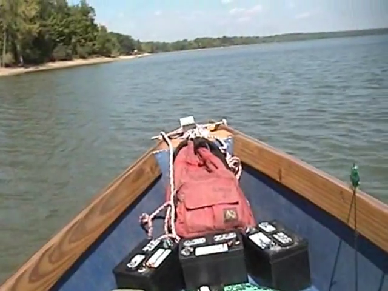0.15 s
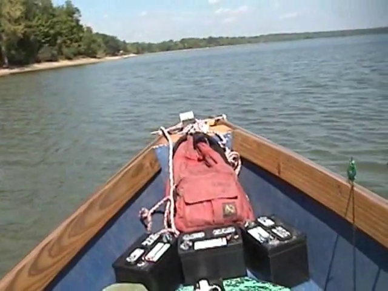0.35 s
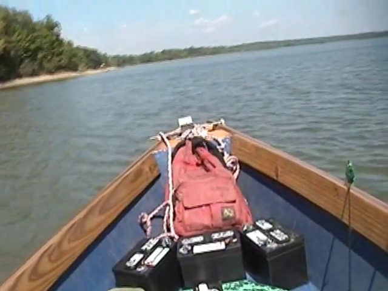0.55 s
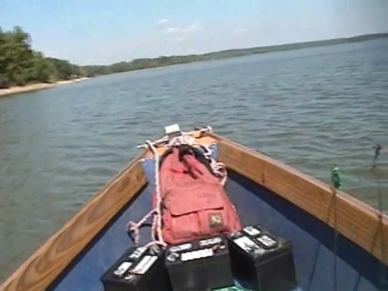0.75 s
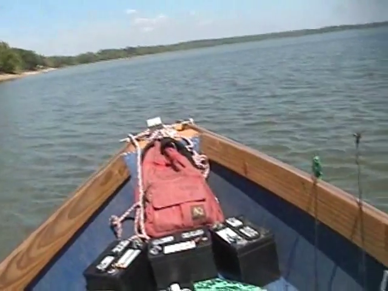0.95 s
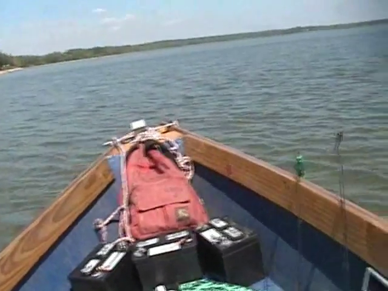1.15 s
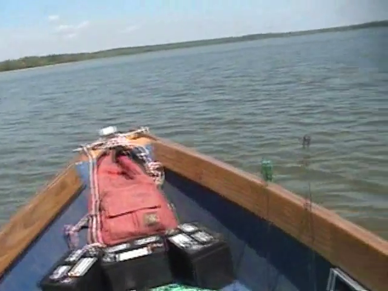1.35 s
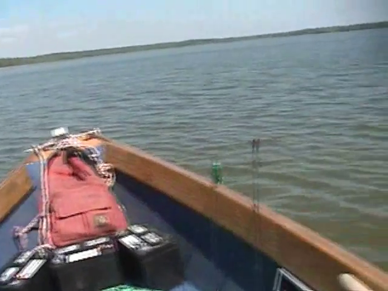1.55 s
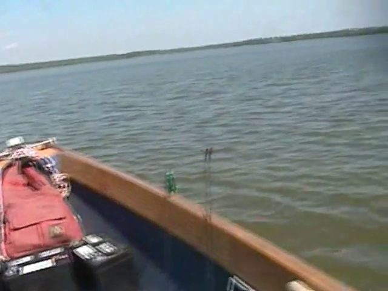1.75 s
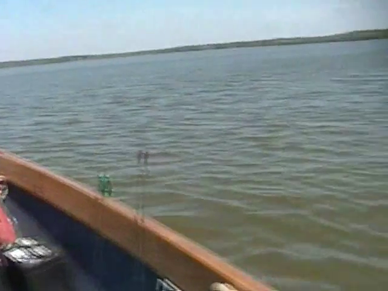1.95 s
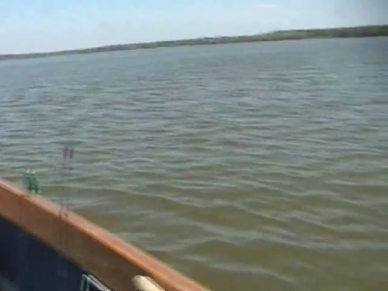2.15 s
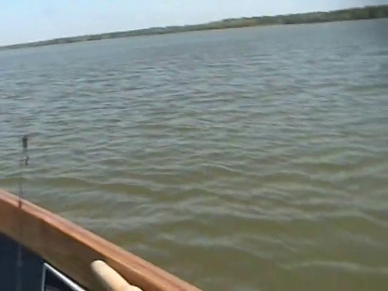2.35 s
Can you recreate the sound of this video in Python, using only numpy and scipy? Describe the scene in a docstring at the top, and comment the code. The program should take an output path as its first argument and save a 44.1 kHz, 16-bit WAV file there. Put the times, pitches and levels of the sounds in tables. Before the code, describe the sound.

Wind rumbles and thumps the stereo onboard microphone over soft water wash. At about 0.25 seconds an electric outboard kicks in, racing up to a loud, gritty, hissing whine. It cuts near 0.6, pitch falling fast with a short groan, and metallic rattle and ringing fade until about 1.3. Small hull clunks come around 1.2, 1.6 and 2.0, over quiet wash, light hiss and a faint wavering hum to 2.4.

```python
"""A grinder motor whines up, pulls for a moment and coasts down: a home-built electric outboard on a small wooden boat.
Its tones are sines tied to the shaft speed; rattle and hiss are noise coloured by the ringing metal casing.
Noise washes along the hull over a hum of steady sines; decaying sines make wind thumps, then hull clunks and glugs.
Wind buffets the two microphone ports with low noise and single pops; the microphone adds hiss and clips softly."""
import sys
import numpy as np
from scipy import signal
from scipy.fft import rfft, irfft, next_fast_len
from scipy.io import wavfile
from scipy.ndimage import uniform_filter1d, map_coordinates

SR = 44100
rng = np.random.default_rng(int(sys.argv[2]) if len(sys.argv) > 2 else 0)


def unload_audio(sound):
    """Save the sound as a 16-bit wav file, at the path given as the first command line argument."""
    columns = np.transpose(np.atleast_2d(sound))
    # keep every value between -1 and 1, then stretch to whole-number steps
    steps = np.round(np.clip(columns, -1, 1) * 32767)
    wavfile.write(sys.argv[1], SR, steps.astype(np.int16))


N = 105840

# likeness of the two ports for the motor noise: freq_hz, correlation
MOTOR_ALIKE = [(500, 1), (1000, 0.94), (2000, 0.7), (5000, 0.89), (9000, 0.16)]
# the motor heard across the two ports: freq_hz, left_over_right_db
MOTOR_BALANCE = [(500, 0.5), (1300, 0.5), (2200, 5), (3700, 10), (6000, 2.5), (12000, 1.5)]
# its phase across the ports: freq_hz, left_lead_radians
MOTOR_LEAD = [(600, 0.18), (1500, 0.32), (3500, 0.59), (6000, 0.76)]


def motor():
    """The motor's shaft, casing noise and ringing parts, placed together across the microphone ports."""
    return placed(shaft() + casing_noise() + ringing_parts(), MOTOR_BALANCE, MOTOR_LEAD)


# shaft speed: time_s, turns_per_s
SHAFT_SPEED = [(.26, 60), (.32, 165), (.345, 192), (.365, 214), (.385, 229), (.42, 248), (.45, 260),
               (.48, 267), (.52, 271.5), (.56, 274.5), (.594, 275.5), (.61, 237), (.625, 217), (.645, 190),
               (.665, 162), (.7, 125), (.8, 75)]
# drive level before the casing and a final trim: time_s, tones_db, fan_db
DRIVE = [(.27, -56, -43), (.33, -33, -28), (.365, -19, -21), (.395, -17.5, -26), (.46, -19.5, -24),
         (.53, -17.5, -21), (.592, -18.5, -24), (.61, -23, -22), (.645, -23.5, -23), (.675, -30, -29),
         (.72, -45, -42), (.8, -60, -57)]
# tones locked to the shaft: multiple of the shaft speed
SHAFT_MULTIPLES = [2, 8, 10, 11, 12, 13, 15, 17, 19, 20, 21]
# level of each of those tones under the drive: level_db
SHAFT_MULTIPLES_DB = [-11, -14, -13, -2, -13, -3, -13, -11, -13, -7, -7]
# noisy bands riding on the speed: multiple, width_hz, level_db under the drive
FAN_BANDS = [(20.36, 180, 2.5), (13.08, 190, 0.5)]
TONE_JITTER, TONE_FLUTTER_DB = .002, 3  # pitch fraction and dB, scaling the random curves


def shaft():
    """Sines at multiples of the shaft speed, and fan bands made by a random curve modulating such sines."""
    speed = curves(SHAFT_SPEED)[0]
    tones_db, fan_db = curves(DRIVE)
    tones = 0
    for multiple, db in zip(SHAFT_MULTIPLES, SHAFT_MULTIPLES_DB):
        level = amp(db + TONE_FLUTTER_DB * wobble(70.7))
        tones = tones + level * sine(multiple * speed * (1 + TONE_JITTER * wobble(59.5)))
    fan = sum(amp(db) * wobble(2 * width) * sine(multiple * speed) for multiple, width, db in FAN_BANDS)
    driven = (tones * amp(tones_db) + fan * amp(fan_db)) * gate(DRIVE)
    # the casing colours these more gently than it does the noise: square root of its gain
    return filtered(driven, lambda hz: amp(-5.5) * casing(hz, column=2) ** .5)


# metal casing resonances: pitch_hz
CASING_HZ = [530, 980, 1528, 1715, 1890, 2070, 2148, 2548, 2720, 2990, 3330, 3936, 4140, 4420, 5485, 6045,
             7543]
# each of them: width_hz, rattle_db, hiss_and_shaft_db (both under the lift, half their dB in peak gain)
CASING = [(56, -14, 10), (50, -1, -8), (18.519, -2, 13.5), (45.4, -6, 13), (13, 1, -21), (16, -5, -16),
          (29, 2, -22), (24.7, 2, 5), (11, 7, 11), (45, -26, 6), (11.4, -3, -2), (24, 10, 6), (19, 8.5, 5),
          (70, -3, -1), (90, -2, -7.5), (29.8, -7, -5), (14, -8, 8.5)]
CASING_LIFT_DB = 9.5  # all resonances over the flat part


def casing(hz, column):
    """Gain of the casing: a flat part plus resonance peaks, summed as power."""
    peaks = 0
    for centre, mode in zip(CASING_HZ, CASING):
        peaks = peaks + amp(mode[column]) / (1 + (2 * (hz - centre) / mode[0]) ** 2)
    return np.sqrt(1 + amp(2 * CASING_LIFT_DB) * peaks)


# motor noise before small trims: time_s, casing_rattle_db, brush_and_fan_hiss_db
MOTOR_NOISE = [(0.25, -62, -67), (0.256, -43, -65), (0.282, -21.5, -32.5), (0.304, -15.5, -24),
               (0.368, -17.5, -15), (0.386, -17.5, -11.5), (0.608, -17.5, -13.5), (0.716, -13, -22),
               (0.726, -14.5, -20.5), (1.224, -34.5, -54.5), (1.434, -50, -60), (1.448, -50, -47),
               (1.462, -48, -62), (1.55, -51, -59)]
# rattle spectrum before the casing: freq_hz, density_db
RATTLE = [(250, -12), (500, -3), (780, -12.5), (1100, 6.5), (1500, -1), (2200, 0.5), (3500, -6.5),
          (5500, -16.5), (6800, -37), (9000, -56)]
# brush and fan hiss spectrum before the casing: freq_hz, density_db
HISS = [(1200, -9.5), (2500, -2), (3500, -3), (5000, -4.5), (6000, -3.5), (7000, -15.5), (8500, -25),
        (11000, -18.5), (13500, -35), (15300, -50)]


def casing_noise():
    """Rattle of the casing and hiss of brushes and fan: two noises, each through the casing resonances."""
    rattle_db, hiss_db = curves(MOTOR_NOISE)
    rattle_noise = rush(lambda hz: closed(RATTLE)(hz) * casing(hz, column=1), MOTOR_ALIKE, patchy_db=2.0)
    hiss_noise = rush(lambda hz: closed(HISS)(hz) * casing(hz, column=2), MOTOR_ALIKE, patchy_db=1.8)
    rattle = amp(rattle_db - 0.5 + 2.8 * wobble(13.32)) * rattle_noise
    hiss = amp(hiss_db - 1.25) * hiss_noise
    return (rattle + hiss) * gate(MOTOR_NOISE)


# ring of the shaft tube: time_s, level_db
TUBE = [(.3, -45), (.33, -31), (.346, -19), (.362, -31), (.5, -30), (.635, -32), (.667, -16), (.695, -26),
        (.72, -29), (.745, -19), (.77, -27), (.806, -21), (.86, -26), (.9, -37), (.926, -29), (.948, -37),
        (1.018, -31), (1.046, -40), (1.076, -34), (1.14, -31), (1.21, -30), (1.24, -46), (1.3, -48)]
# drumming of the hull: time_s, level_db
HULL = [(0.2, -40), (0.26, -33), (0.286, -32), (0.358, -24), (0.488, -46), (0.668, -29), (0.752, -35),
        (0.8, -42)]
# a thin whistle in the run-down: time_s, level_db
WHISTLE = [(.78, -54), (.815, -40), (.85, -47), (.9, -46), (.94, -55)]
# a falling groan after switch-off: time_s, pitch_hz, level_db
GROAN = [(.66, 531, -36), (.7, 529, -22.5), (.735, 476, -33), (.765, 443, -23.5), (.79, 400, -46)]
# gear mesh tone while the motor pulls: time_s, pitch_hz, level_db
GEAR_MESH = [(.36, 780, -38), (.384, 836, -21), (.393, 870, -29), (.404, 890, -17), (.44, 928, -25),
             (.456, 960, -19), (.49, 972, -17), (.544, 986, -20), (.594, 986, -21), (.604, 965, -32),
             (.615, 850, -42)]
# a casing panel sings: time_s, pitch_hz, level_db
PANEL = [(.37, 1690, -34), (.41, 1700, -22), (.435, 1700, -28), (.474, 1729, -16), (.5, 1732, -20),
         (.53, 1735, -31), (.56, 1740, -38)]
TUBE_HZ, TUBE_TWIN_HZ, TUBE_TWIN_DB = 1133, 1156, -8  # the twin's level is relative to the first ring
HULL_HZ, WHISTLE_HZ = 119, 5006


def ringing_parts():
    """Single unsteady sines for tube, hull and whistle at set pitches, and groan, gears and panel on pitch curves."""
    tube = ring(TUBE, TUBE_HZ) + amp(TUBE_TWIN_DB) * ring(TUBE, TUBE_TWIN_HZ)
    fixed_pitch = tube + ring(HULL, HULL_HZ) + ring(WHISTLE, WHISTLE_HZ)
    return fixed_pitch + sum(ring(rows, curves(rows)[0]) for rows in (GROAN, GEAR_MESH, PANEL))


# wash along the hull: time_s, level_db
WASH_LEVEL = [(0.0, -32), (0.23, -33), (0.38, -17.5), (0.46, -20.5), (0.59, -21), (0.75, -30),
              (1.14, -29.5), (1.4, -33), (2.4, -31)]
# wash spectrum: freq_hz, density_db
WASH = [(40, -22), (100, -8.5), (250, -8), (330, -1), (450, -0.5), (620, 0.5), (800, -3), (1000, -6.5),
        (1200, -7.5), (1500, -11.5), (3000, -20), (6400, -27), (7200, -33)]
# likeness of the wash at the two ports: freq_hz, correlation
WASH_ALIKE = [(200, 0.97), (800, 1), (1600, 0.7), (5000, 0.38)]
# the wash across the ports: freq_hz, left_over_right_db
WASH_BALANCE = [(300, 1), (800, -2.5), (2200, 3.5), (3700, 5.5), (6100, 1)]


def water_wash():
    """Wash along the hull: coloured noise on a slightly fluttering level curve."""
    level = amp(curves(WASH_LEVEL)[0] + 0.63 * wobble(24.1))
    wash = level * rush(closed(WASH), WASH_ALIKE, patchy_db=1.15)
    return placed(wash, WASH_BALANCE, [(600, 0.033), (3000, 0.19)])


# short thumps of wind on the microphone, then clunks and glugs at the hull:
# start_s, start_pitch_hz, level_db before attack and a gain of 3, t60_s
THUMPS = [(.15, 171, -17, 0.047), (0.169, 310, -12, 0.025), (.228, 630, -12, 0.017),
          (0.257, 359, -12, 0.063), (.78, 594, -14.5, 0.023), (1.155, 665, -18, .025),
          (1.185, 287, -18, 0.092), (1.203, 870, -18.5, 0.015), (1.315, 297, -30, 0.011),
          (1.644, 520, -23, 0.04), (2.04, 374, -19, 0.04)]
THUMP_RISE = 0.34  # the pitch climbs by twice this fraction over one t60


def thumps_and_glugs():
    """Wind thumps on the microphone, then hull clunks and glugs: decaying sines that rise in pitch."""
    out, t = np.zeros(N + SR), np.arange(SR // 4) / SR
    for start, hz, db, t60 in THUMPS:
        phase = 2 * np.pi * hz * (t + THUMP_RISE * t * t / t60)
        attack = 1 - np.exp(-t / (0.19 * t60))
        out[round(start * SR):][:len(t)] += amp(db - 60 * t / t60) * attack * 3 * np.sin(phase)
    return out[:N]


# buffeting of the microphone, before a 3 dB lift: time_s, level_db
WIND_LEVEL = [(0.0, -26.5), (0.04, -26.5), (0.07, -35), (0.16, -21), (0.26, -22), (0.31, -18),
              (0.45, -42.5), (0.55, -39), (0.58, -26.5), (0.62, -35), (0.65, -29), (0.73, -25.5),
              (0.78, -39.5), (0.95, -25), (1.0, -34), (1.08, -37), (1.12, -39), (1.2, -36), (1.29, -35.5),
              (1.36, -33.5), (1.45, -51.5), (1.9, -66), (2.0, -45), (2.14, -40.5), (2.17, -43), (2.35, -54),
              (2.4, -58)]
# buffeting spectrum: freq_hz, density_db
BUFFET = [(12, -67.5), (20, -18), (117, 0), (242, 0.5), (280, -6), (507, -8.5), (755, -16), (1500, -25.5),
          (1950, -43), (3300, -120)]
# wind pops: centre_s, width_s, left_db, right_db
POPS = [(0.171, 0.00042, -8, -15), (.231, 0.00033, -7, -2.5), (.32, .001, -22, -12),
        (0.72, 0.0014, -27, -21), (.92, 0.0012, -9, -13), (1.318, 0.00091, -22, -27),
        (1.382, 0.00061, -32, -24), (1.489, 0.0027, -32, -33), (1.98, 0.0025, -30, -38),
        (2.05, 0.0027, -29, -24), (2.145, 0.0023, -19, -27), (2.25, 0.0027, -35, -33)]
BUFFET_LUMP_DB, BUFFET_LUMP_RATE = 3.5, 45  # lump scale, knots a second


def wind():
    """Lumpy low noise, different at each port, and brief pressure pops pushing the ports opposite ways."""
    lumps = amp(BUFFET_LUMP_DB * np.array([wobble(BUFFET_LUMP_RATE), wobble(BUFFET_LUMP_RATE)]))
    # above 3 kHz only a faint level floor remains
    gain = lambda hz: amp(np.where(hz > 3000, -62.0, along(BUFFET, hz)))
    buffeting = unit(lumps * rush(gain, [(100, -0.065), (400, -0.13)], patchy_db=0.0))
    out = amp(curves(WIND_LEVEL)[0] + 3.0) * buffeting
    for centre, width, left_db, right_db in POPS:
        u = (np.arange(N) / SR - centre) / width
        pulse = (1 - u * u) * np.exp(-u * u / 2)
        out = out + np.array([[amp(left_db)], [-amp(right_db)]]) * pulse
    return out


# steady hum lines: pitch_hz
HUM_HZ = [70.6, 140.8, 211.3, 281.5, 344.9, 563.9, 622, 947.5, 1038, 1874]
# each line before flutter and swell: rms_db
HUM_DB = [-52, -54, -54, -56.5, -44.5, -46.5, -38.5, -62, -49.5, -58.5]
# swell of the whole hum: time_s, gain_db
HUM_SWELL = [(0, -3), (1.2, -2), (1.34, 4.5), (1.45, -3), (1.6, 0.9), (1.85, 4.5), (1.93, 1.5), (2.05, 2.5),
             (2.33, 5.5), (2.4, 0)]
HUM_FLUTTER_DB, HUM_FLUTTER_RATE = 2, 35  # flutter scale, knots a second


def hum():
    """Sines that waver together in pitch, flutter separately in level and swell together."""
    waver = 1 + .001 * wobble(4)
    lines = 0
    for hz, db in zip(HUM_HZ, HUM_DB):
        lines = lines + amp(db + HUM_FLUTTER_DB * wobble(HUM_FLUTTER_RATE)) * sine(hz * waver)
    return amp(curves(HUM_SWELL)[0]) * lines


def scene():
    """All sources at the microphone on the boat."""
    return motor() + water_wash() + thumps_and_glugs() + wind() + hum()


# microphone hiss spectrum: freq_hz, density_db
MIC_HISS = [(3000, -8), (7000, 0.5), (10000, -0.5), (13000, -4), (14300, -10), (15200, -35)]
MIC_HISS_DB = -55  # rms
CLIP_TOP, CLIP_HARD = 1.05, 8  # ceiling amplitude, sharpness of the knee
TOP_HZ = 15400


def record(dry):
    """The microphone hisses, the input clips softly, and nothing is kept above the band limit."""
    x = dry + amp(MIC_HISS_DB) * rush(closed(MIC_HISS), [(5000, 0.11), (12000, 0.24)], patchy_db=4.5)
    x = x / (1 + np.abs(x / CLIP_TOP) ** CLIP_HARD) ** (1 / CLIP_HARD)
    return filtered(x, lambda hz: hz < TOP_HZ)


def ring(rows, hz):
    """One resonance, unsteady in pitch and level, on a level curve (last column)."""
    level = amp(curves(rows)[-1] + 2.5 * wobble(70))
    return level * sine(hz * (1 + .003 * wobble(40))) * gate(rows)


def sine(hz):
    """A sine of rms 1 on a pitch curve, from a random phase."""
    return np.sqrt(2) * np.sin(2 * np.pi * np.cumsum(hz) / SR + rng.uniform(0, 2 * np.pi))


def rush(gain, alike, patchy_db):
    """Stereo noise of rms 1, coloured by gain(Hz), with patches of random level in time and pitch."""
    z = signal.stft(rng.standard_normal((2, N)), nperseg=512)[2]
    field = uniform_filter1d(uniform_filter1d(rng.standard_normal(z.shape[1:]), 4, 0), 8, 1)
    pair = signal.istft(z * amp(patchy_db * unit(field)), nperseg=512)[1][:, :N]
    # mid and side shares that give the ports the wanted correlation
    turn = lambda hz: np.arccos(np.clip(along(alike, hz), -1, 1)) / 2
    mid, side = filtered(pair, lambda hz: gain(hz) * np.array([np.cos(turn(hz)), np.sin(turn(hz))]))
    return unit(np.array([mid + side, mid - side]))


def placed(pair, balance, lead):
    """Level and phase difference between the microphone ports, split evenly over both."""
    half = np.array([[.5], [-.5]])
    return filtered(pair, lambda hz: amp(half * along(balance, hz)) * np.exp(1j * half * along(lead, hz)))


def filtered(x, response):
    """x times a complex response of frequency."""
    m = next_fast_len(N + SR // 2)
    return irfft(rfft(x, m) * response(np.fft.rfftfreq(m, 1 / SR)), m)[..., :N]


def closed(points):
    """Gain of a spectrum that falls away at both ends."""
    low, high = (points[0][0] / 2, -70), (points[-1][0] * 1.5, -70)
    return lambda hz: amp(along([low] + list(points) + [high], hz))


def along(points, hz):
    """(Hz, value) points interpolated on a log axis."""
    f, v = np.transpose(points)
    return np.interp(np.log(hz + 1), np.log(f + 1), v)


def curves(rows):
    """One value per sample for each column after the time, held at both ends."""
    s, *columns = np.transpose(rows)
    return [np.interp(np.arange(N) / SR, s, column) for column in columns]


def gate(rows):
    """1 between the first and last row, fading over 20 ms outside."""
    first, last = rows[0][0], rows[-1][0]
    return np.interp(np.arange(N) / SR, [first - .02, first, last, last + .02], [0, 1, 1, 0])


def wobble(rate):
    """A smooth random curve, rate knots a second."""
    return map_coordinates(rng.standard_normal(int(N * rate / SR) + 4), [np.arange(N) * rate / SR])


def amp(db):
    """dB to gain."""
    return 10 ** (np.asarray(db) / 20)


def unit(x):
    """Scale to rms 1."""
    return x / np.sqrt(np.mean(x ** 2) + 1e-20)


dry = scene()
out = record(dry)
unload_audio(out)
```